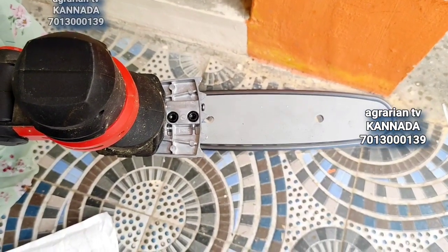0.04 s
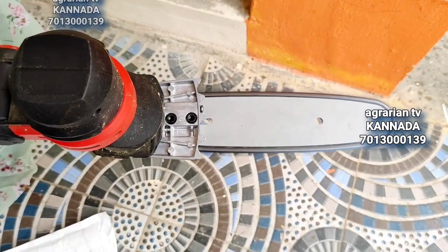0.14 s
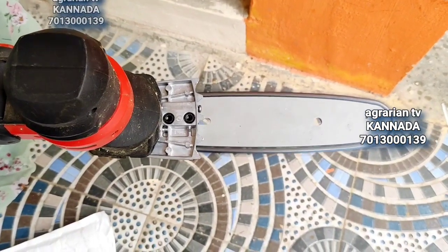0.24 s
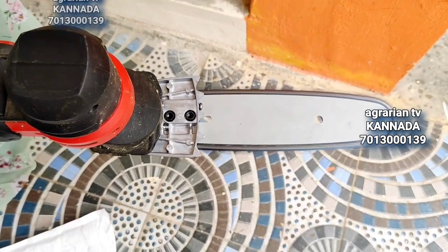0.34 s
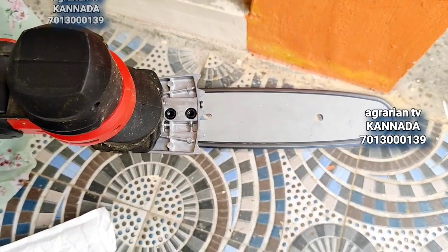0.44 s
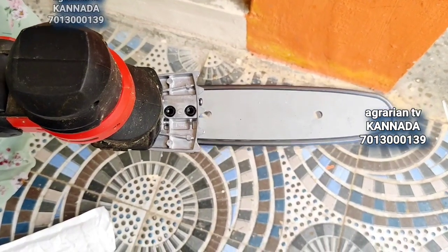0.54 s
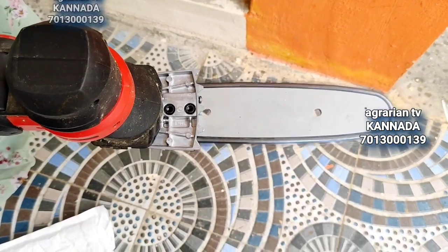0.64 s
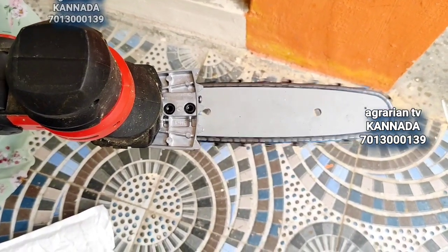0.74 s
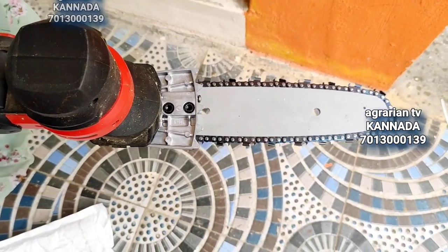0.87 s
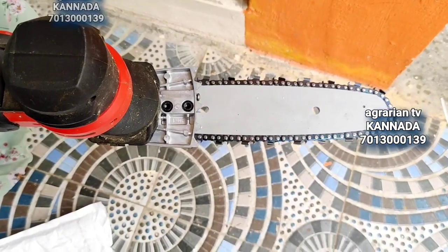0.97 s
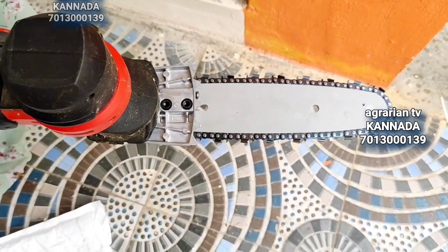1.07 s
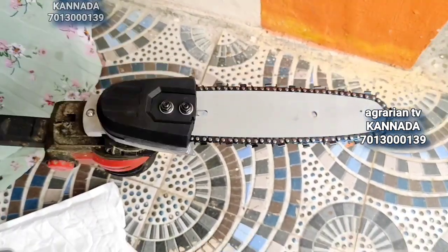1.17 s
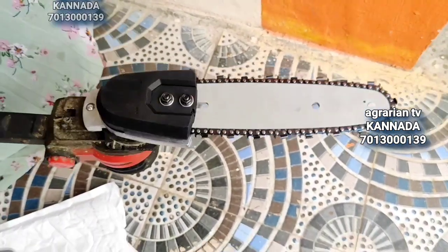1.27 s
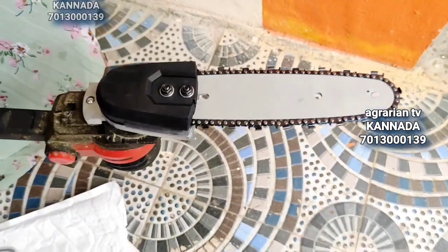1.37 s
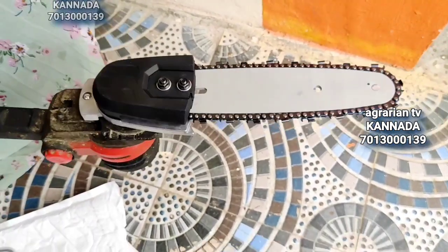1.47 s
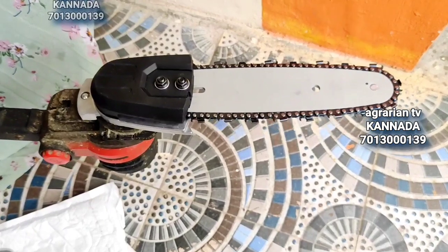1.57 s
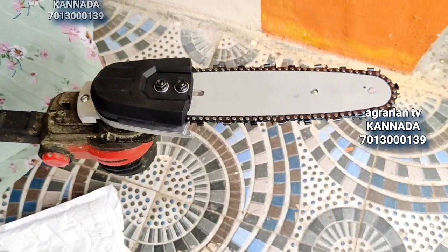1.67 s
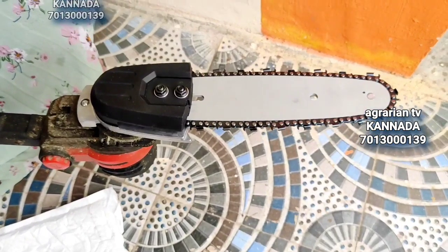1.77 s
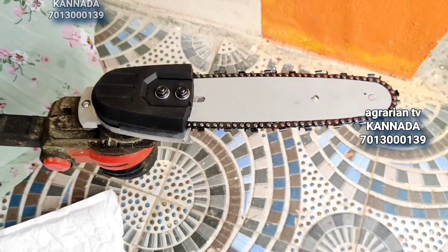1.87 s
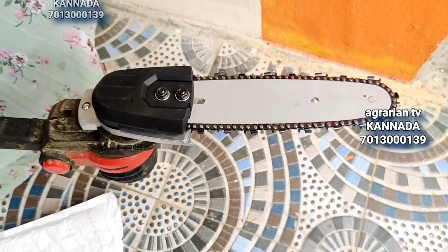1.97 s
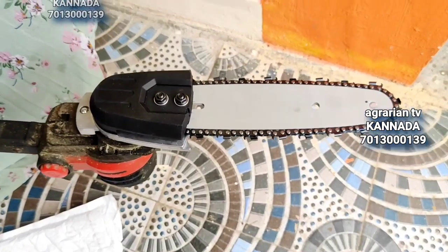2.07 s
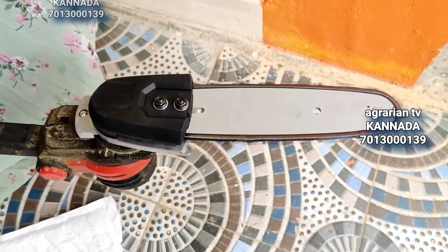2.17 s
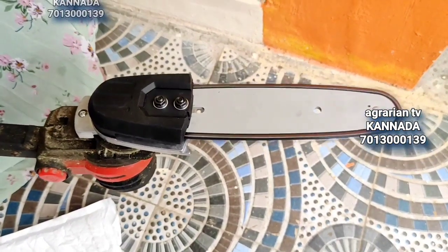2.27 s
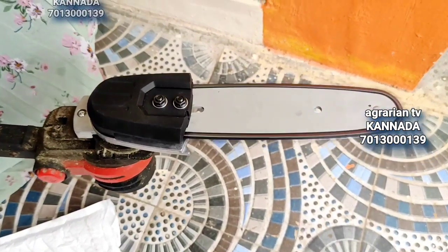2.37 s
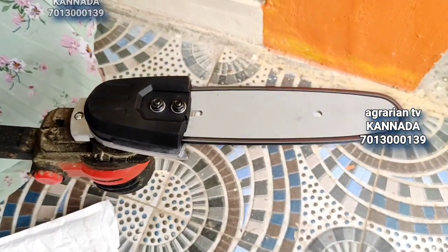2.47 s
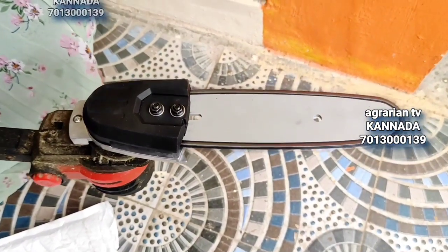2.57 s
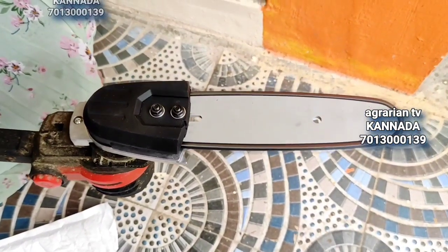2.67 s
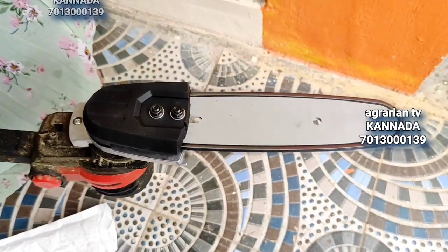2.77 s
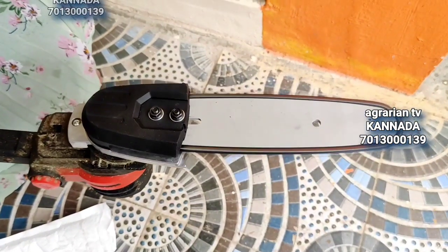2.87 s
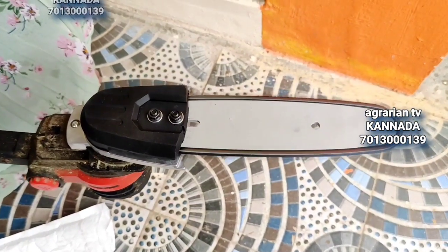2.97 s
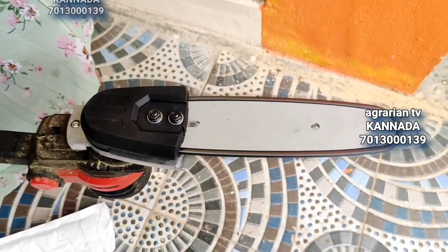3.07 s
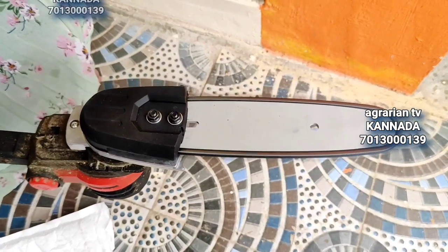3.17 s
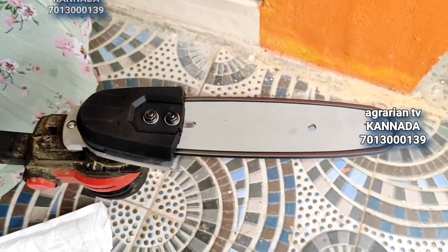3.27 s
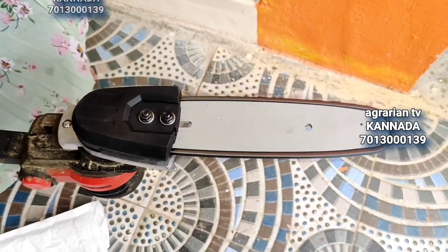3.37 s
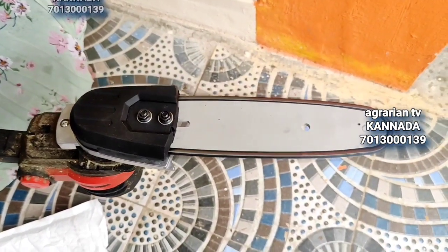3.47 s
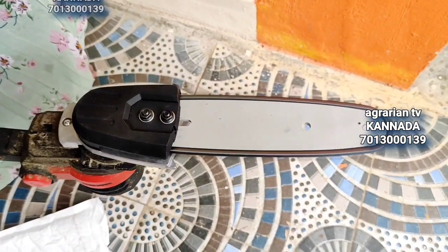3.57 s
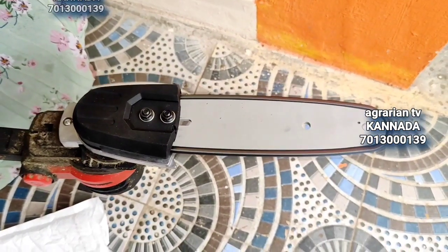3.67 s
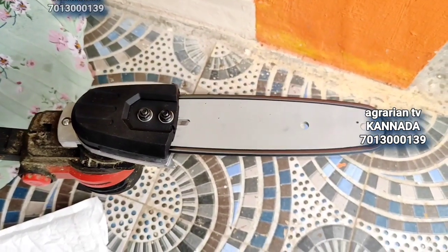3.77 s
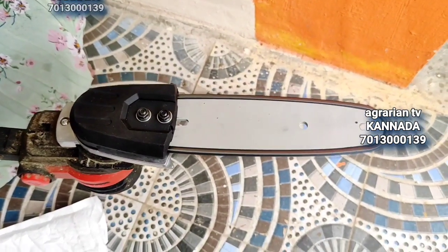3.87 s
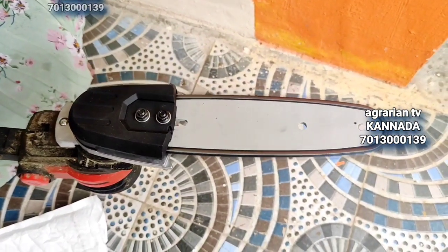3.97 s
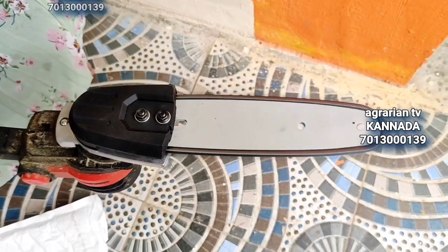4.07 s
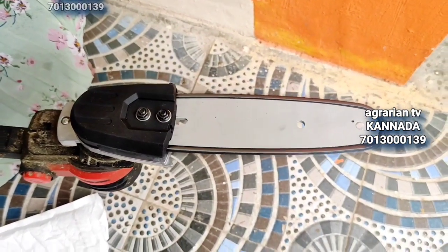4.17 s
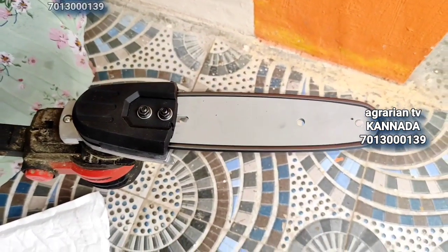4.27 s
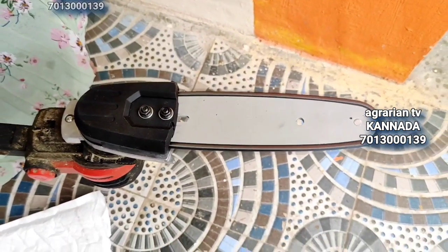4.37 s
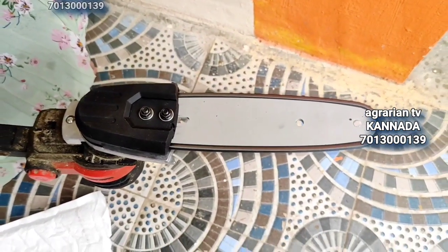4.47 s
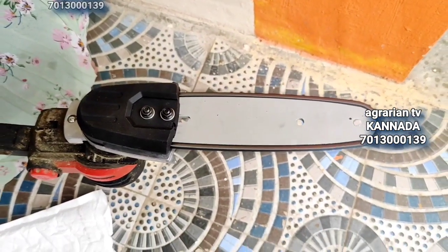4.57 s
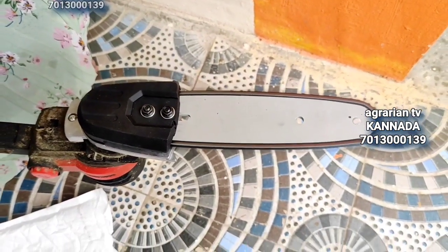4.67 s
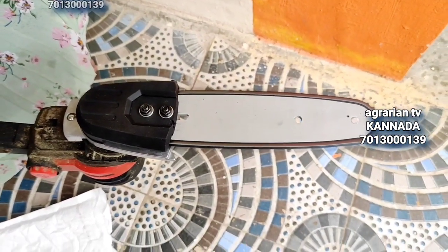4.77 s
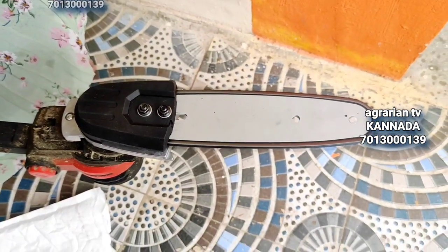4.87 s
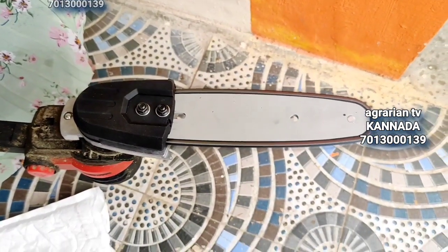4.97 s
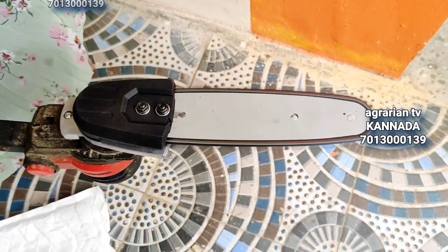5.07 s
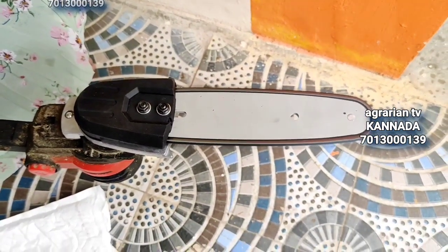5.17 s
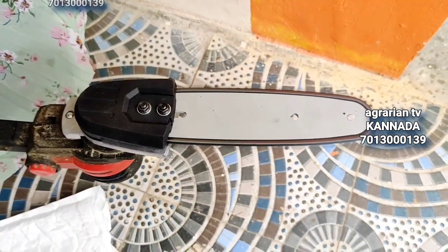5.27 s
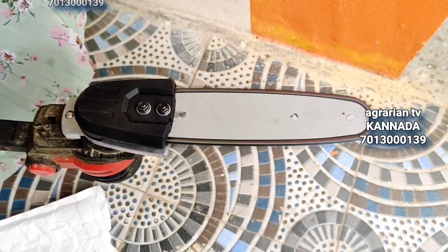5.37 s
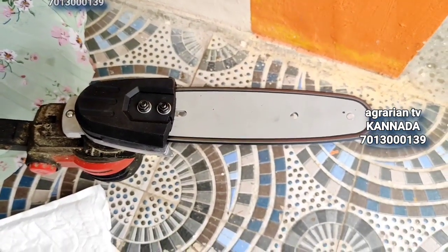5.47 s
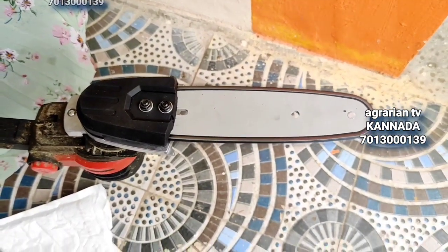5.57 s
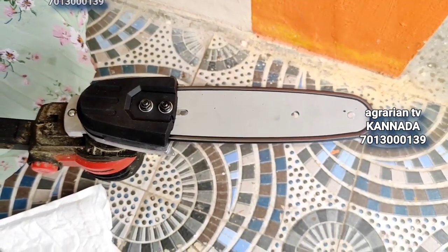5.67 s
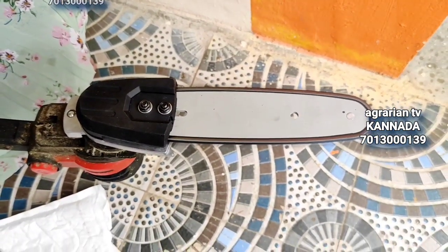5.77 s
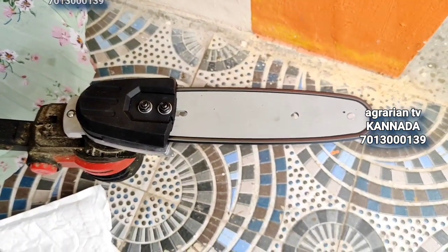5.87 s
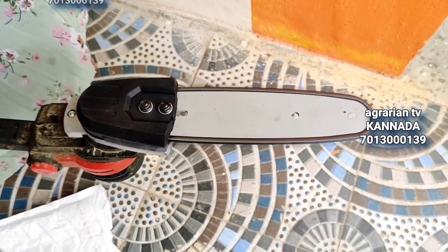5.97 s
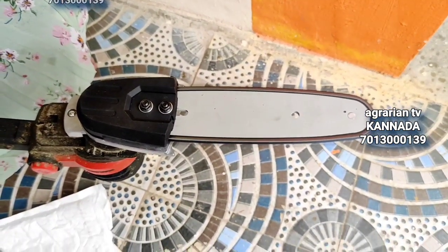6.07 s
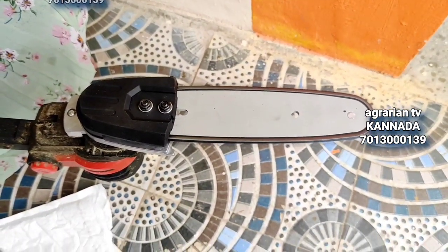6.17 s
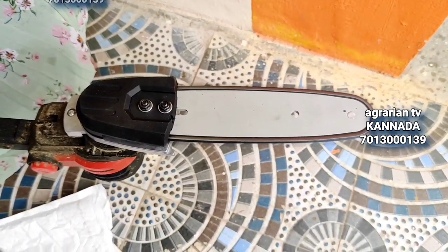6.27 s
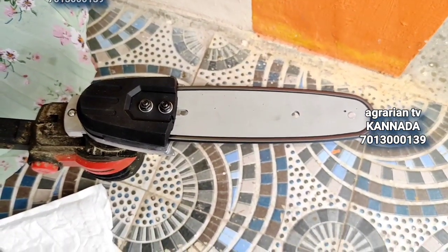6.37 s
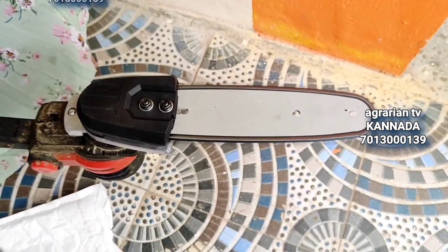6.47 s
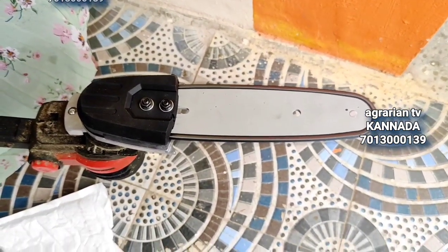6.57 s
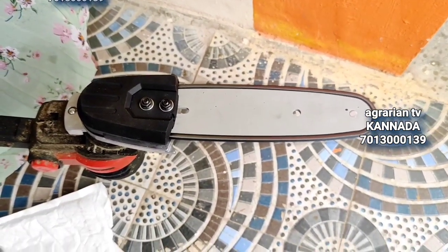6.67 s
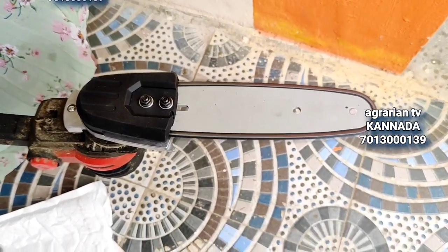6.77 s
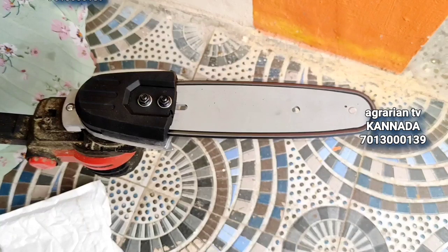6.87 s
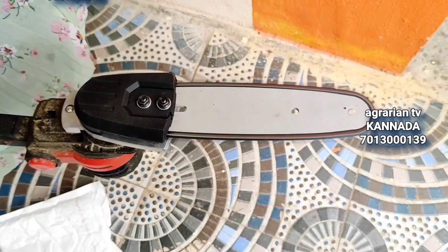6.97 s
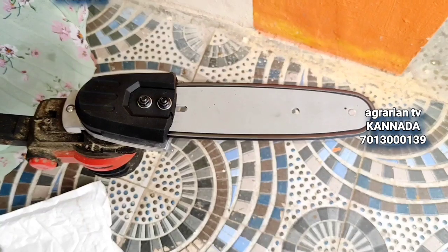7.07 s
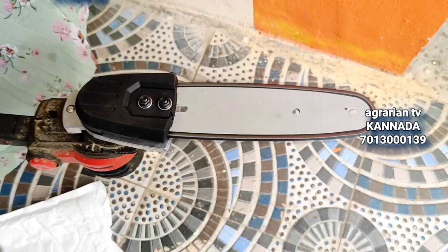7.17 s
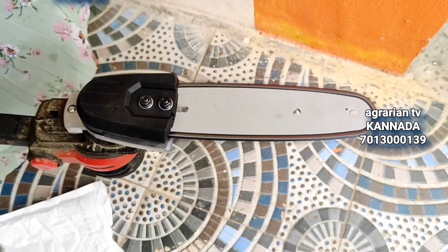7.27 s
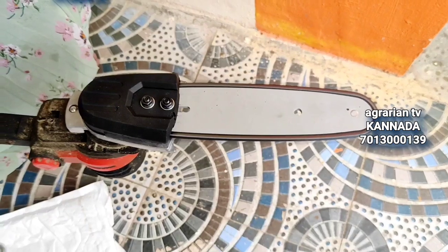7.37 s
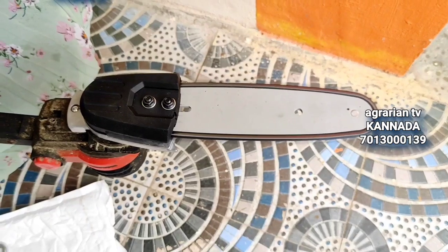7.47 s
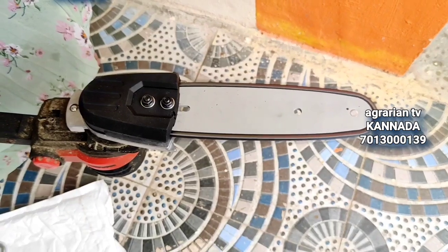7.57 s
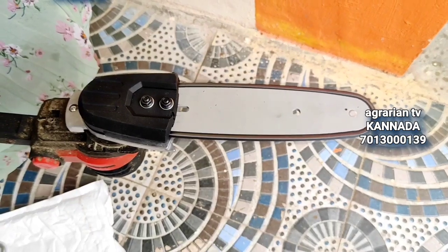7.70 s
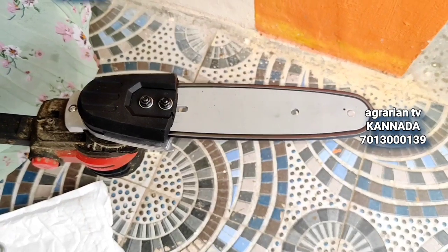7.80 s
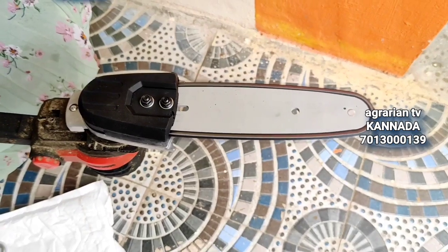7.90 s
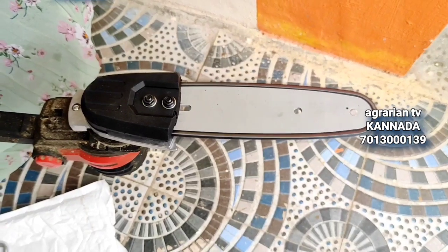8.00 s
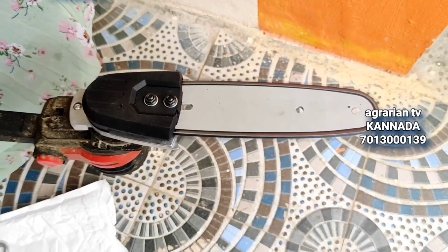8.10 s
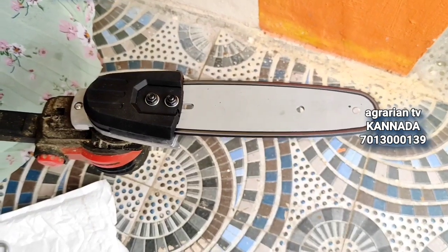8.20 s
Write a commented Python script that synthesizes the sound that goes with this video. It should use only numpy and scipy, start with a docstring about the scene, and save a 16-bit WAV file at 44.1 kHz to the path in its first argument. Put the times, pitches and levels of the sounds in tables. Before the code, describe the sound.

In a tiled room, very close, a small battery-powered chainsaw runs freely from the start: a high gear whine around 3 kHz, fan hum near 1 kHz and dense steely chain rattle with hiss. At about 0.4 s power is cut; pitch and rattle sink, the chain flapping unevenly, with clinks around 0.5, 0.8 and 1.1 s and dull body knocks from 1.26 s until it stops near 1.4 s. Until 2.4 s there is quiet room air, low handling bumps, dry rubbing and faint grip squeaks. A double plastic click snaps at 2.46 s, and the motor sweeps up in roughly 0.6 s, straining and bright. It is strongest around 3 s, then eases slightly over several seconds into a constant whirring, rattling run, with small flares of chain noise from 5 to 7.5 s and a tiny clink near 6.9 s. It is still running at the end, about 8.2 s.

```python
"""In a tiled room, close by, a cordless grinder motor drives a small chainsaw bar with no load.
It runs and coasts to a stop, is turned over in the hand, then the switch clicks and it spins up again.
Tones locked to one shaft speed make the hum of the cooling fan and the whine of the gears.
Snaps of the links and sliding noise, coloured by the steel bar, make the rattle of the loose chain.
Clinks, knocks, grip squeaks and the switch are short rings or tones; handling is shaped noise."""
import sys
import numpy as np
from scipy import signal
from scipy.fft import rfft, irfft
from scipy.io import wavfile
from scipy.ndimage import uniform_filter1d

SR = 44100
rng = np.random.default_rng(int(sys.argv[2]) if len(sys.argv) > 2 else 0)


def store_wav(level_fs):
    """Save 16-bit WAV to argv[1]."""
    pcm = np.round(np.clip(np.atleast_2d(level_fs), -1, 1) * 32767)
    wavfile.write(sys.argv[1], SR, pcm.T.astype(np.int16))


N = 363384
TIME, HZ = np.arange(N) / SR, np.fft.rfftfreq(N, 1 / SR)

# the power is cut, the shaft comes to rest, the power returns [s]
OFF_S, STOP_S, ON_S = .42, 1.42, 2.485
RAMP_TURNS_PER_S2 = 425  # steady ramp of the soft start
# gear teeth on the motor shaft; sprocket turns and links passing for each turn of the shaft
PINION_TEETH, SPROCKET_RATIO, LINK_RATIO = 11, .3297, 1.46
CREEP_SPEED = 22  # shaft turns a second; around and below this the chain fades towards silence
LEFT_LAG_S = 10 / 44100  # the left microphone hears the tool later

# colour of the chain on its bar: (frequency [Hz], relative level [dB])
BAR_COLOUR = [(59, -58), (100, -22.5), (211, -21), (265, -18), (320, -19.5), (538, -15), (690, -15),
              (1000, -12), (1460, -6), (3480, 3.5), (4470, -0.5), (7210, -15), (9640, -16), (11600, -21.5),
              (14300, -23.5)]
# housing resonances that a gliding tone sweeps through: (frequency [Hz], width [Hz], lift [dB])
HOUSING_MODES = [(732, 360, 17.5), (1142, 180, 10.5), (1600, 250, -5), (2300, 280, 10), (3305, 150, 10),
                 (3855, 360, 11), (4870, 200, 11.5)]


def amp(db):
    """Decibels to amplitude."""
    return 10 ** (np.asarray(db) / 20)


def evened(x):
    """Scaled to an RMS of one."""
    return x / np.sqrt(np.mean(x ** 2) + 1e-20)


def read(points, hz):
    """A spectrum table on a log-frequency axis."""
    f, value = np.transpose(points)
    return np.interp(np.log(hz + 1), np.log(f + 1), value)


def curves(rows):
    """Every column of a table at every sample."""
    s, *columns = np.transpose(rows)
    return [np.interp(TIME, s, c) for c in columns]


def since(s):
    """Seconds gone by after a moment, zero before it."""
    return np.maximum(TIME - s, 0)


def shaped(x, gain):
    """A sound filtered by a gain for each frequency."""
    return irfft(rfft(x) * gain, N)


def causal(gain):
    """The minimum phase that makes a colour ring only after a blow."""
    cepstrum = irfft(np.log(np.maximum(gain, 1e-5)), N)
    return np.exp(rfft(cepstrum * np.r_[1, np.full(N // 2 - 1, 2), np.zeros(N - N // 2)]))


def lift_db(modes, hz):
    """Resonant humps on a spectrum."""
    return sum(db / (1 + (2 * (hz - centre) / width) ** 2) for centre, width, db in modes)


def wander(rate_hz):
    """Slow chance of unit size: low-passed noise, computed at every 32nd sample."""
    knots = rng.standard_normal(N // 32)
    keep = np.exp(-2 * np.pi * rate_hz * 32 / SR)
    smooth = signal.lfilter([1], np.poly([keep, keep]), knots)
    return evened(np.interp(TIME, TIME[::32][:len(knots)], smooth))


def panned(side_db):
    """Left and right gains of constant power."""
    pair = amp(np.array([side_db, -side_db]).reshape(2, -1) / 2)
    return pair / np.sqrt(np.mean(pair ** 2, 0))


def add(mix, s, sound):
    """Lays a sound into the mix at a time in seconds."""
    part = mix[round(s * SR):][:len(sound)]
    part += sound[:len(part)]


def lingering(power, decay_s):
    """Power that dies away exponentially."""
    keep = np.exp(-1 / (decay_s * SR))
    return signal.lfilter([1 - keep], [1, -keep], power)


def direct_pair(x):
    """The straight path reaches the left microphone a little later."""
    return np.array([np.roll(x, round(LEFT_LAG_S * SR)), x])


def scattered(power, near_s=0.0031, far_s=0.028, far_share=0.79):
    """Noise with a direct part, and reflections by so many paths that each microphone hears its own."""
    # share of the power that arrives by reflection: (frequency [Hz], share [0-1])
    reflected = [(100, 0.99), (500, 0.51), (2500, 1), (4500, 0.98), (9000, 1), (13000, 0.89)]
    direct = direct_pair(np.sqrt(power) * rng.standard_normal(N))
    far_share = np.clip(far_share, 0, 1)
    echo_power = (1 - far_share) * lingering(power, near_s) + far_share * lingering(power, far_s)
    echoes = np.sqrt(echo_power) * rng.standard_normal((2, N))
    share = np.clip(read(reflected, HZ), 0, 1)
    return shaped(direct, np.sqrt(1 - share)) + shaped(echoes, np.sqrt(share))


def shaft_speed(kick=30, kick_s=.04, coast_s=.85):
    """Turns a second: full speed, a coast against drag and friction, then a soft start that levels off."""
    # free-running speed of the motor shaft: (time [s], speed [turns a second])
    top_speed = [(.39, 267.7), (3.3, 268.8), (4.1, 270), (5.3, 271.3), (6.43, 270.8), (6.51, 268.2),
                 (7.8, 268.6), (8.24, 269.3)]
    top = curves(top_speed)[0]
    rest = np.exp(-(STOP_S - OFF_S) / coast_s)
    coast = top * np.maximum(np.exp(-since(OFF_S) / coast_s) - rest, 0) / (1 - rest)
    # a first kick in turns a second, then the steady ramp
    ramp = kick * (1 - np.exp(-since(ON_S) / kick_s)) + RAMP_TURNS_PER_S2 * since(ON_S)
    return coast + ramp / (1 + (ramp / top) ** 15) ** (1 / 15)


def load(speed, settle_s=3.12, unload_s=0.032):
    """Three states of the drive, each 0-1: freshly started, speeding up, coasting as the gears unload."""
    fresh = (TIME > ON_S) * np.exp(-(since(ON_S) / settle_s) ** 2)
    pushing = np.clip(np.gradient(speed) * SR / RAMP_TURNS_PER_S2, 0, 1)
    coasting = (TIME < ON_S) * (1 - np.exp(-since(OFF_S) / unload_s))
    return np.array([fresh, pushing, coasting])


def limpness(speed, whip_speed=59.7, spread=3.2):
    """0 while the chain whips round the bar, 1 once it hangs slack; both settings in shaft turns a second."""
    return .5 + .5 * np.tanh((whip_speed - speed) / (2 * spread))


def chain_levels(speed, clatter_share=0.8, fade_speed=112, grab_s=0.083):
    """Gains of clatter, rattle and hiss: loud after a start, flaring now and then, dying away in the coast."""
    # low clatter, rattle, high hiss: (base level in the first run [dB], in the second [dB],
    # extra when fresh [dB], while speeding up [dB], while coasting [dB],
    # loss below fade_speed [dB per turn a second], loss when the whipping stops [dB])
    bands = [(-41.5, -41.5, 2.5, 4, 0.5, 0.1, 6), (-23, -25.5, 8, 2, 0.5, 0.26, 10),
             (-30.5, -29, 6.5, -1, 0, 0.34, 16)]
    # the slack chain flares up or briefly runs smooth:
    # (time of the middle [s], length [s], rattle change [dB], hiss change [dB])
    flares = [(0.47, 0.029, -3, -0.5), (0.498, 0.048, 3, 2), (0.623, 0.056, -3, -5.5),
              (0.681, 0.087, 5, 1.5), (0.77, 0.089, 1.5, -0.5), (0.86, 0.091, -0.5, -5.5),
              (5.028, 0.026, 1, -0.5), (5.393, 0.051, 2, 0), (5.557, 0.092, 0, 2), (5.91, .06, -1.5, 0),
              (6.008, 0.077, 1, -0.5), (6.175, 0.077, -4.5, -2.5), (6.66, 0.12, 1.5, 3), (6.77, .1, -2, -1),
              (6.863, 0.043, 2.5, 3.5), (7.02, 0.042, 2.5, 2), (7.12, 0.086, -2, 0), (7.298, 0.071, -4, -5),
              (7.392, 0.23, 3, 6), (7.6, 0.67, -0.5, -2.5)]
    fresh, pushing, coasting = load(speed)
    rattle_db, hiss_db = 0, 0
    for s, length, rattle_peak_db, hiss_peak_db in flares:
        bump = np.exp(-np.minimum((2 * (TIME - s) / length) ** 2, 20))
        rattle_db = rattle_db + rattle_peak_db * bump
        hiss_db = hiss_db + hiss_peak_db * bump
    slow, limp = np.maximum(fade_speed - speed, 0), limpness(speed)
    grab = 1 - np.exp(-since(ON_S) / grab_s)  # the chain takes up its slack
    gains = []
    for row, flare_db in zip(bands, [clatter_share * rattle_db, rattle_db, hiss_db]):
        first_db, second_db, fresh_db, push_db, coast_db, fade_db, limp_db = row
        first = amp(first_db + coast_db * coasting - fade_db * slow - limp_db * limp)
        first = first * np.tanh(speed / CREEP_SPEED) ** 0.19
        second = grab * amp(second_db + fresh_db * fresh + push_db * pushing)
        gains.append(np.where(TIME < ON_S, first, second) * amp(flare_db))
    return gains


def ripple(depth_db=3.3, spacing_hz=30, top_hz=6000):
    """The many weak modes of bar and cover leave fine peaks and dips, other ones at each microphone."""
    grid = np.arange(0, SR / 2, max(spacing_hz, 15))
    heights = rng.standard_normal((1500, 2))[:len(grid)].T
    depth = depth_db * np.interp(HZ, [300, 1200, top_hz, 2 * top_hz], [0.86, 1, 1.0, 0.93])
    return np.array([np.interp(HZ, grid, h) for h in heights]) * depth


def shifting(x, depth_db=2.0, patch_hz=260, patch_s=0.042):
    """The chain strikes the bar at ever different places, so the bands that ring most keep changing."""
    z = signal.stft(x, nperseg=1024, noverlap=512)[2]
    across = np.fft.fftfreq(z.shape[1], SR / 1024)[:, None]
    along = np.fft.fftfreq(z.shape[2], 512 / SR)
    blur = np.exp(-(across * patch_hz) ** 2 - (along * patch_s) ** 2)
    patches = evened(np.fft.ifft2(np.fft.fft2(rng.standard_normal(z.shape[1:])) * blur ** 2).real)
    return signal.istft(z * amp(depth_db * patches), nperseg=1024, noverlap=512)[1][:, :N]


def chain_rattle(turns, speed, scatter_db=2.5, ring_s=0.00048, slide=1.0, strain=1.8, wobble=0.095,
                 flap_db=0.5, snap_db=-5, snap_spread_db=4.0):
    """Links snap on sprocket and bar over sliding hiss and a first scrape; tension swings with the sprocket."""
    at = np.flatnonzero(np.diff(np.floor(2 * LINK_RATIO * turns)))
    size, late, side = rng.standard_normal((N, 3))[:len(at)].T
    at = np.clip(at + (late * .0005 * SR).astype(int), 0, N - 1)
    size = np.minimum(size, 2.6)
    blows, snaps = np.zeros((2, N))
    blows[at] = amp(scatter_db * size) ** 2
    snaps[at] = np.sign(side) * amp(snap_spread_db * np.minimum(size, 2))
    blow_power = lingering(blows, ring_s) / (speed + 45)
    blow_power = blow_power / blow_power.mean()
    slide_power = slide ** 2 * speed / speed.max()
    scrape_power = strain ** 2 * load(speed)[1] * np.exp(-speed / CREEP_SPEED)
    tension = (1 + wobble * np.cos(2 * np.pi * SPROCKET_RATIO * turns)) * amp(flap_db * wander(3.6))
    noise = scattered((blow_power + slide_power + scrape_power) * tension ** 2)
    sharp = evened(snaps * np.tanh(speed / CREEP_SPEED) / np.sqrt(speed + 120))
    return noise + amp(snap_db) * tension * direct_pair(sharp)


def chain(turns, speed, gains, low_db=0, mid_db=-1.5, high_db=0, flicker_db=0.8, slack_ring=0.42):
    """The steel bar colours the rattle; a slack chain damps its modes; three bands follow their own levels."""
    # left-right balance of the bar: (frequency [Hz], left over right [dB])
    bar_side = [(150, -2.5), (400, 2), (1200, 1.5), (2500, 5), (3200, 4.5), (4200, 6.5), (5600, 3.5),
                (7100, -8), (9000, 0.5), (13000, 2)]
    # steel modes heard from the motor side, in the first run: (frequency [Hz], width [Hz], lift [dB])
    motor_modes = [(1136, 71, 5.5), (1670, 130, 3.5), (1800, 160, 2.5), (2400, 770, 3), (2900, 110, 6.5),
                   (3250, 340, -5), (3552, 50, 10), (3725, 59, 8.5), (4400, 300, 1), (5080, 200, 5.5),
                   (7040, 670, 10)]
    # steel modes heard from the cover side, in the second run: (frequency [Hz], width [Hz], lift [dB])
    cover_modes = [(1074, 174, 6), (2300, 280, 5.5), (2697, 16, 15), (2940, 180, -1.5), (3130, 250, -1.5),
                   (3530, 62, 0), (3740, 110, -2), (3826, 110, 2), (4020, 100, 4.5), (4154, 45, 5.3),
                   (4820, 240, 1), (4816, 26, 7.5), (5340, 540, 2.5), (7147, 700, 9)]
    rattle = chain_rattle(turns, speed)
    steel = causal(amp(read(BAR_COLOUR, HZ) + ripple()) * panned(read(bar_side, HZ)))
    motor_side, cover_side = lift_db(motor_modes, HZ), lift_db(cover_modes, HZ)
    taut = shaped(rattle, steel * causal(amp(motor_side)))
    slack = shaped(rattle, steel * causal(amp(slack_ring * motor_side)))
    second = shaped(rattle, steel * causal(amp(cover_side)))
    sound = shifting(np.where(TIME < 2, taut + (slack - taut) * limpness(speed), second))
    low, high = 1 / (1 + (HZ / 1300) ** 6), 1 - 1 / (1 + (HZ / 5500) ** 12)
    out = 0
    for band, db, gain in zip([low, 1 - low - high, high], [low_db, mid_db, high_db], gains):
        part = shaped(sound, band)
        # even out the slow level, then apply the level of the band
        held = np.sqrt(abs(uniform_filter1d(part.mean(0) ** 2, SR // 12)) + 1e-12)
        out = out + part / held * gain * amp(db + flicker_db * wander(17.6))
    return out


def bar_ring(speed, rattle, waver_db=2, fresh_db=-11, meet_width=70, swell_s=7.14, swell_db_per_s=5):
    """The rattle rings the bar's strong modes, most of all as the gears glide through them."""
    # (frequency [Hz], width [Hz], left over right [dB], base level against the rattle in the first run [dB],
    # in the second [dB], shaft speed that excites it most [turns a second], lift at that speed [dB])
    strong_modes = [(2377, 125, 6.5, -29.5, -9, 193, 10.5), (3900, 110, -9, -33.5, -21, 110, 19.5),
                    (4870, 100, -2, -39, -20, 200, 24)]
    out, fresh = 0, load(speed)[0]
    for hz, width_hz, side_db, first_db, second_db, meet_speed, meet_db in strong_modes:
        resonance = 1 / (1 + (2 * (HZ - hz) / width_hz) ** 2)
        ring = evened(shaped(scattered(np.ones(N)), resonance))
        level_db = np.where(TIME < ON_S, first_db, second_db) + fresh_db * fresh
        level_db = level_db + lift_db([(meet_speed, meet_width, meet_db)], speed)
        # late in the second run the lowest mode grows louder
        level_db = level_db + (hz == strong_modes[0][0]) * swell_db_per_s * since(swell_s)
        out = out + ring * panned(side_db) * rattle * amp(level_db + waver_db * wander(45))
    return out


def tones(rows, orders, turns, speed, drift, drift_hz, flutter_db, growth, lowest_hz, motor_side_db=0,
          thinning=0):
    """Wavering lines locked to the shaft swell in the housing's resonances and radiate little when slow."""
    out, second, full = np.zeros((2, N)), TIME > 2, speed.max()
    # under load the whole housing sings, and reaches both microphones together
    lag_s = LEFT_LAG_S * (1 - load(speed)[1])
    strongest_db = max(row[1] for row in rows)
    for order, (first_db, second_db, side_db) in zip(orders, rows):
        phase = 2 * np.pi * (order * turns + rng.random()) + drift * wander(drift_hz)
        lag = 2 * np.pi * order * speed * lag_s
        hz = order * speed[::64] + 1
        sweep_db = lift_db(HOUSING_MODES, hz) - lift_db(HOUSING_MODES, order * full)
        sweep_db -= 20 * np.log10(1 + (lowest_hz / hz) ** 8)
        # weak lines need speed to build up
        sweep_db -= thinning * (strongest_db - second_db) * (1 - speed[::64] / full)
        level_db = np.where(second, second_db, first_db) + np.interp(TIME, TIME[::64], sweep_db)
        level = amp(level_db + flutter_db * wander(drift_hz))
        sides = np.where(second, panned(side_db), panned(side_db + motor_side_db))
        out += np.sqrt(2) * level * sides * np.sin([phase - lag, phase])
    return out * (speed / full + 1e-9) ** growth


def motor(turns, speed, shaft_level_db=0, fan_level_db=-3.0, gear_level_db=-5.5, link_level_db=-2):
    """Shaft, fan and link hum; gear mesh with sidebands of the sprocket turn, shaft harmonics, higher lines."""
    # one line for each order, before the level of its group:
    # (base level in the first run [dB], in the second [dB], left over right [dB])
    shaft_lines = [(-56.5, -50, 3), (-47, -51.5, -7.5), (-52, -58, -1)]
    fan_lines = [(-33.5, -38.5, 4), (-63.5, -61, -12)]
    link_lines = [(-66, -63.5, 8.1), (-55, -60.5, 9.2), (-52, -55.5, 8.7), (-52, -59, 2)]
    # one line for each gear or shaft tone, same columns;
    # the first run adds motor_side_db to the left-right column
    gear_lines = [(-40, -48, -13), (-49, -51, 9), (-40, -37.5, 28.5), (-37, -36.5, 20), (-41.5, -48, 1),
                  (-18.5, -27.5, 6.5), (-27.5, -28.5, -6.5), (-42, -39, 0), (-34.5, -34.5, 0),
                  (-36, -39, -1), (-25.5, -26, 3), (-24, -32, -16), (-43.5, -36.5, -2), (-29, -45, 8),
                  (-28, -52, -1), (-44, -31.5, 22), (-55, -45.5, 10.5), (-37.5, -41.5, 6),
                  (-47, -38.5, 5.5), (-48, -39.5, 9), (-48.5, -40.5, 4.5), (-55.5, -41, -4)]
    # orders of those lines: (multiple of the shaft speed)
    shaft_orders = [1, 2, 3]
    fan_orders = [4, 5]
    link_orders = [1.46, 2.92, 3.7, 4.38]
    # distance of each gear or shaft tone from the first mesh tone: (multiple of the sprocket speed)
    mesh_offsets = [-9.1, -6, -4, -3, -1, 0, 1, 2, 3, 4.1, 5, 6.05, 7, 8, 9.1, 10, 10.5, 11, 12, 13.7, 20.7,
                    36]
    # answer of fan with links, and of gears, to the load:
    # (extra when fresh [dB], while speeding up [dB], while coasting [dB])
    fan_load = (11, 1.5, -8)
    gear_load = (9, 0.9, -12.5)
    fan_db, gear_db = np.array([fan_load, gear_load]) @ load(speed)
    gear_orders = PINION_TEETH + np.array(mesh_offsets) * SPROCKET_RATIO
    shaft = tones(shaft_lines, shaft_orders, turns, speed, drift=0.183, drift_hz=29, flutter_db=1.0,
                  growth=5.4, lowest_hz=201.6)
    fan = tones(fan_lines, fan_orders, turns, speed, drift=0.17, drift_hz=10.0, flutter_db=2.0,
                growth=2.7, lowest_hz=202)
    links = tones(link_lines, link_orders, turns, speed, drift=0.24, drift_hz=8.6, flutter_db=3.5,
                  growth=3.6, lowest_hz=300)
    gears = tones(gear_lines, gear_orders, turns, speed, drift=0.32, drift_hz=13.4, flutter_db=3.5,
                  growth=2.1, lowest_hz=865, motor_side_db=16, thinning=1.59)
    fan_and_links = amp(fan_level_db) * fan + amp(link_level_db) * links
    return amp(shaft_level_db) * shaft + amp(fan_db) * fan_and_links + amp(gear_db + gear_level_db) * gears


def gear_rasp(turns, speed, rattle, growth=1.05):
    """The jerking chain shakes the gears: rough bands around the whine that glide with the shaft."""
    # one band for each order: (width [Hz], left over right [dB],
    # base level against the rattle in the first run [dB], in the second [dB], extra while speeding up [dB])
    rough_bands = [(420, 5, -11.5, -22, -3), (130, 16, -14.5, -18.5, 12), (50, 11.5, -24, -10, 3.5),
                   (70, 4, -21.5, -25, 18)]
    # centre of each band: (multiple of the shaft speed)
    orders = [11, 12.6, 14.32, 17.4]
    out, pushing = 0, load(speed)[1]
    for order, (width_hz, side_db, first_db, second_db, push_db) in zip(orders, rough_bands):
        # slow noise on a sine and a cosine makes a band of noise around a gliding centre
        keep = np.exp(-np.pi * width_hz / SR)
        a, b = signal.lfilter([1], np.poly([keep, keep]), rng.standard_normal((2, 2, N)))
        phase = 2 * np.pi * order * turns
        band = evened(a * np.cos(phase) + b * np.sin(phase))
        level_db = np.where(TIME < ON_S, first_db, second_db) + push_db * pushing
        out = out + band * panned(side_db) * amp(level_db)
    return out * rattle * (speed / speed.max() + 1e-9) ** growth


def touches(rows):
    """Envelope of several touches, each swelling to its peak and dying away."""
    power = 0
    for s, rise, decay, db in rows:
        distance = np.maximum((s - TIME) / rise, (TIME - s) / decay)
        power = power + (amp(db) * np.exp(-np.minimum(distance, 20))) ** 2
    return np.sqrt(power)


def hands(speed, steady_db=-65, shaking_db=-58, holding_db=-70):
    """Low rumble and a dry rustle while the grip changes; the freshly started tool shakes in the hands."""
    # colours of the two noises: (frequency [Hz], relative level [dB])
    rumble_colour = [(20, -32.5), (50, -11), (72, 2.5), (115, -4), (165, -23.5), (260, -25), (600, -54),
                     (2000, -86)]
    rustle_colour = [(150, -45.5), (250, -13.5), (571, -12.5), (621, -6.5), (946, -13.5), (2350, -11),
                     (3020, -14.5), (5930, -18), (14000, -36)]
    # hands bump the tool as it is turned over: (time of the peak [s], rise [s], decay [s], level [dB])
    bumps = [(1.435, 0.0088, .045, -44), (1.52, .02, .03, -47), (1.66, 0.11, 0.19, -51),
             (1.81, .02, 0.054, -46), (2.0, .02, .03, -54), (2.25, 0.13, 0.38, -51)]
    # hands rub on its grip: (time of the peak [s], rise [s], decay [s], level [dB])
    rubs = [(1.43, 0.0046, 0.071, -61), (1.722, .001, .06, -57), (1.8, 0.037, 0.024, -51),
            (1.95, .04, 0.045, -68), (2.06, 0.015, 0.071, -67), (2.265, 0.036, .04, -56),
            (2.32, .005, 0.053, -43.5), (2.457, 0.0033, 0.11, -45.5)]
    rumble = evened(shaped(scattered(np.ones(N)), amp(read(rumble_colour, HZ))))
    rustle = evened(shaped(scattered(np.ones(N)), amp(read(rustle_colour, HZ))))
    held = amp(steady_db) + amp(shaking_db) * load(speed)[0]
    return rumble * np.hypot(touches(bumps), held) + rustle * np.hypot(touches(rubs), amp(holding_db))


def air(level_db=-64, common=0.39):
    """The quiet of the room: steady noise, partly shared by both sides, levelled by its part above 300 Hz."""
    # (frequency [Hz], relative level [dB])
    room_colour = [(15, -41.5), (25, -4.5), (83, -7.5), (179, -10.5), (348, -19.5), (695, -19), (1150, -24),
                   (3910, -30), (9920, -44.5), (12900, -39.5), (14400, -47)]
    noise = rng.standard_normal((2, N)) + common * rng.standard_normal(N)
    noise = shaped(noise, amp(read(room_colour, HZ)))
    return amp(level_db) * noise / shaped(noise, HZ > 300).std()


def clinks(ring_s=0.0012, level_db=-3, tick_db=12):
    """Single clinks of chain and tool, running, coasting or handled: a sharp tick, then a short ring."""
    # (time [s], strength before the common levels [dB])
    clink_times = [(0.501, -9), (0.78, -19), (.787, -15), (1.083, -31), (1.112, -28), (1.128, -34),
                   (1.141, -27), (1.155, -30), (1.169, -31), (1.184, -34), (1.198, -34), (1.227, -38),
                   (1.259, -41), (1.311, -39), (2.316, -36), (6.865, -21)]
    t, power, ticks = np.arange(SR // 20) / SR, np.zeros(N), np.zeros(N)
    for s, db in clink_times:
        add(power, s, (amp(db + level_db) * np.exp(-t / ring_s)) ** 2)
        add(ticks, s, amp([db + tick_db]))
    sound = direct_pair(ticks) + scattered(power, near_s=0.0018, far_s=0.028, far_share=0.43)
    return shaped(sound, causal(evened(amp(read(BAR_COLOUR, HZ)) / (1 + (HZ / 6000) ** 4))))


def knocks(rise_s=0.0016):
    """The tool's body knocks dully as the chain drags to a stop: a few low damped modes."""
    # (time [s], strength before the mode levels [dB])
    strokes = [(1.26, -48.5), (1.275, -56), (1.314, -49), (1.33, -53.5), (1.428, -50)]
    # (frequency [Hz], relative level [dB], time to fall 60 dB [s])
    body_modes = [(198, 2, 0.071), (330, 0, 0.06), (1080, -7, .04)]
    t, out = np.arange(SR // 6) / SR, np.zeros(N)
    for s, db in strokes:
        ring = 0
        for hz, mode_db, t60 in body_modes:
            ring = ring + amp(mode_db - 60 * t / t60) * np.sin(2 * np.pi * (hz * t + rng.random()))
        add(out, s, amp(db) * ring * (1 - np.exp(-t / rise_s)))
    return out


def squeaks(waver=.003):
    """The grip squeaks faintly under the fingers: short tones of wavering pitch."""
    # (time of the middle [s], length [s], frequency [Hz], peak level [dB])
    grip_tones = [(2.215, .11, 3822, -71), (2.41, 0.13, 607, -61)]
    bend = np.cumsum(1 + waver * wander(40)) / SR
    out = 0
    for s, length, hz, db in grip_tones:
        swell = np.exp(-np.minimum((2 * (TIME - s) / length) ** 4, 20))
        out = out + amp(db) * swell * np.sin(2 * np.pi * hz * bend)
    return out


def switch(side_db=6, rise_s=0.0017, ring_s=0.0077, echo_db=-6, rasp_db=-7):
    """The plastic housing rings briefly at each snap, and the walls answer."""
    # the switch snaps and bounces: (time [s], peak level before panning [dB])
    snaps = [(2.458, -20), (2.4655, -18.5)]
    # (frequency [Hz], relative level [dB], time to fall 60 dB before the common decay ring_s [s])
    plastic_modes = [(2280, -12, 0.1), (3000, 0.5, 0.033), (4544, -11, 0.035), (5340, -28, 0.017)]
    t, out = np.arange(SR // 10) / SR, np.zeros(N)
    ring = sum(amp(db - 60 * t / t60) * np.sin(2 * np.pi * hz * t) for hz, db, t60 in plastic_modes)
    ring = ring * (1 - np.exp(-t / rise_s)) * np.exp(-t / ring_s)
    for s, db in snaps:
        add(out, s, amp(db) * ring / abs(ring).max())
    colour = sum(amp(db) / (1 + ((HZ - hz) / 220) ** 2) for hz, db, _ in plastic_modes)
    colour = colour + amp(rasp_db) / (1 + ((HZ - 3300) / 1200) ** 4)
    echoes = shaped(scattered(out ** 2, near_s=.001, far_s=0.018, far_share=0.71), evened(colour))
    return (out + amp(echo_db) * echoes) * panned(side_db)


def gear_strain(turns, speed, drift=1.0, drift_hz=45, flutter_db=4.0, lowest_hz=2000, flare=1.65):
    """While the motor pushes, wavering overtones of the teeth glide up and flare in the housing's resonances."""
    # one overtone for each order: (base level before resonance and load [dB], left over right [dB])
    overtones = [(-40, 4), (-41, 6), (-42, 1)]
    # (multiple of the shaft speed)
    orders = [17.4, 20.6, 25.2]
    out, pushing = 0, load(speed)[1]
    for order, (db, side_db) in zip(orders, overtones):
        hz = order * speed + 1
        level_db = db + flare * lift_db(HOUSING_MODES, hz) + flutter_db * wander(drift_hz)
        level = amp(level_db) / (1 + (lowest_hz / hz) ** 6)
        wave = np.sin(2 * np.pi * order * turns + drift * wander(drift_hz))
        out = out + np.sqrt(2) * level * panned(side_db) * wave
    return out * pushing ** 2 * np.sqrt(speed / speed.max())


def scene(sway=0.83, centre_db=1.0):
    """One shaft speed drives fan, gears and chain; the tool sways a little between the microphones."""
    # the tool drifts: (time [s], left over right before centring and scaling [dB])
    drift_path = [(0.0, -1), (1.0, 1), (2.5, 3), (3.1, -3.5), (3.35, 1.5), (3.75, -1), (4.4, 4), (4.9, 6.5),
                  (5.6, -0.8), (5.85, 1.5), (7.2, 1.5), (7.4, -2), (8.24, 4.5)]
    speed = shaft_speed()
    turns = np.cumsum(speed) / SR
    clatter, rattle, hiss = chain_levels(speed)
    saw = chain(turns, speed, [clatter, rattle, hiss]) + bar_ring(speed, rattle)
    saw = saw + motor(turns, speed)
    saw = saw + gear_rasp(turns, speed, rattle) + gear_strain(turns, speed)
    saw = saw * panned(sway * (curves(drift_path)[0] - centre_db))
    return saw + hands(speed) + air() + clinks() + knocks() + squeaks() + switch()


def record(dry, ceiling=.92, edge_hz=14400):
    """The highest peaks are rounded off smoothly; then a steep low-pass ends the treble."""
    rounded = dry / (1 + (dry / ceiling) ** 8) ** (1 / 8)
    low_pass = signal.firwin(511, edge_hz, window=("kaiser", 9), fs=SR)
    return signal.oaconvolve(rounded, low_pass[None], "same")


dry = scene()
out = record(dry)
store_wav(out)
```